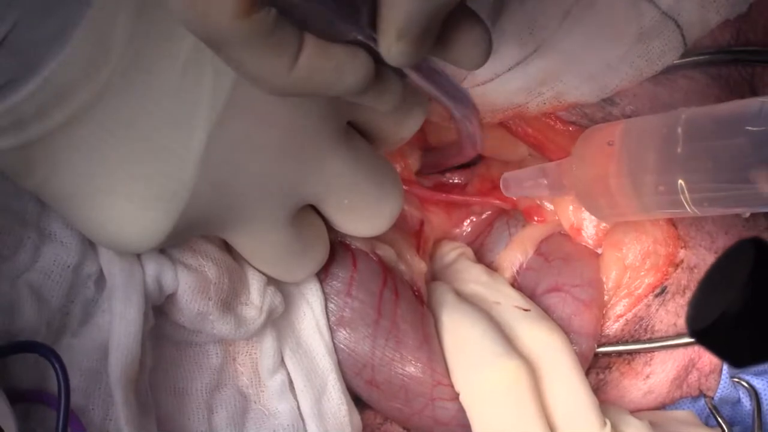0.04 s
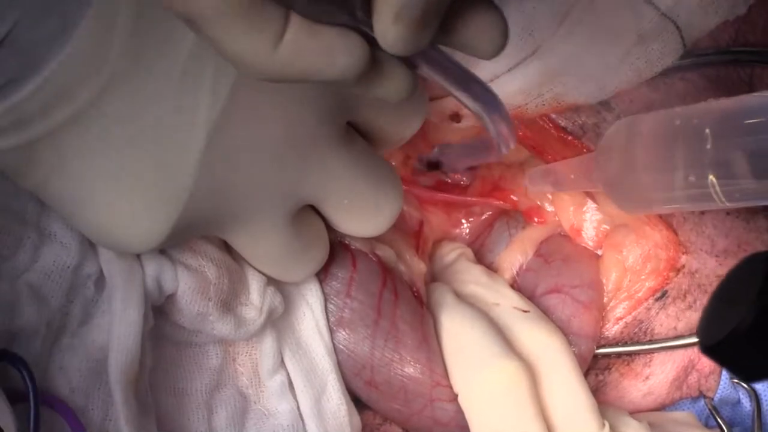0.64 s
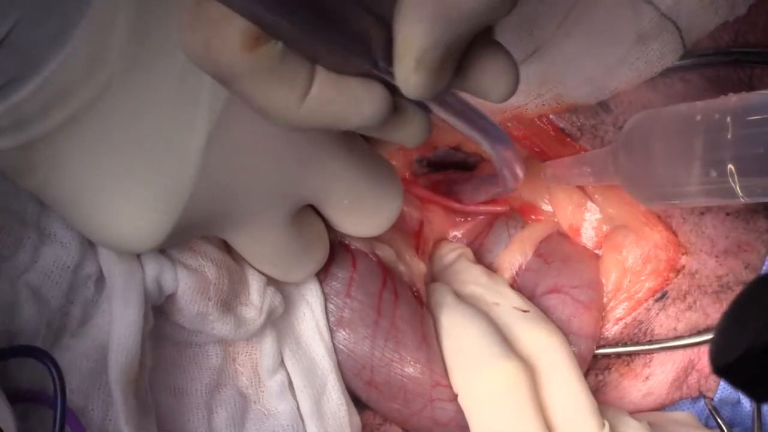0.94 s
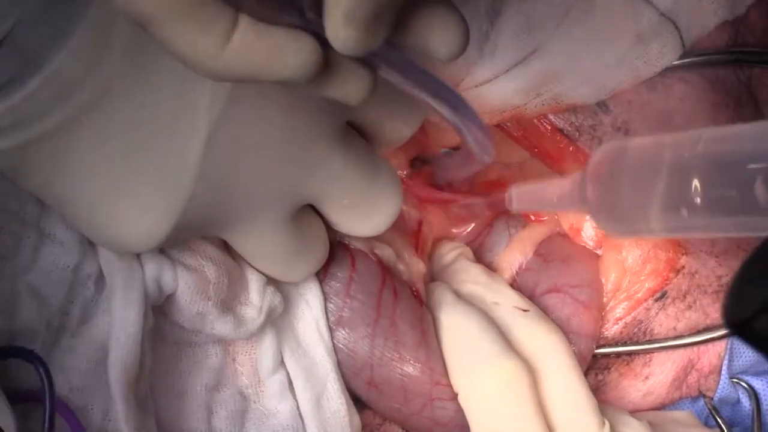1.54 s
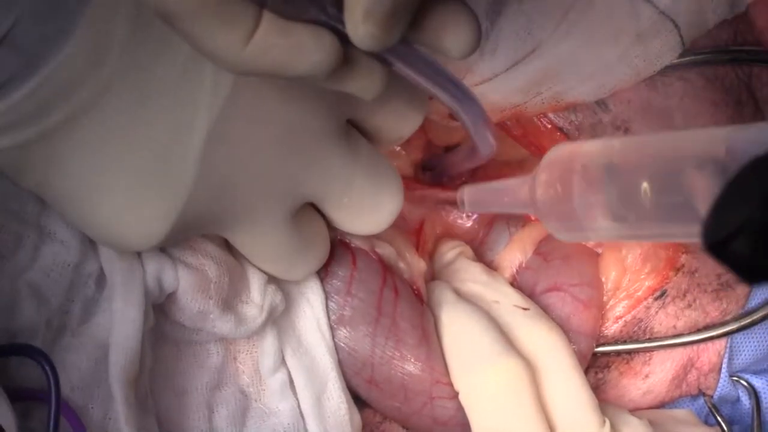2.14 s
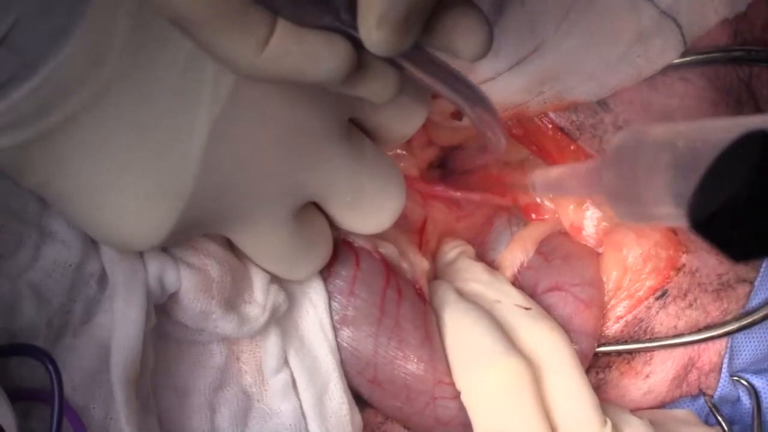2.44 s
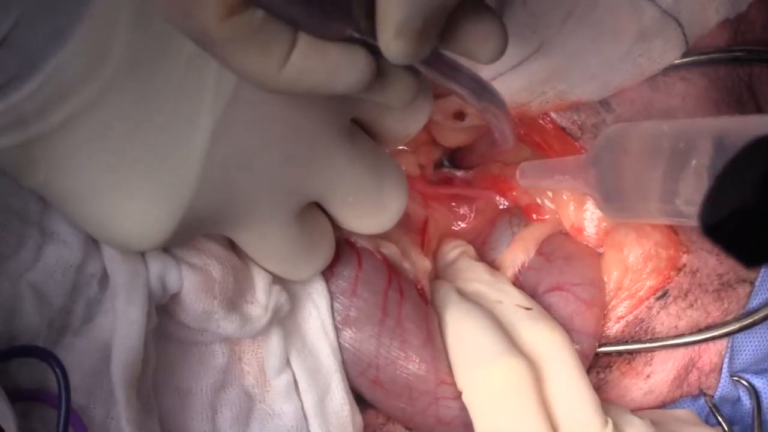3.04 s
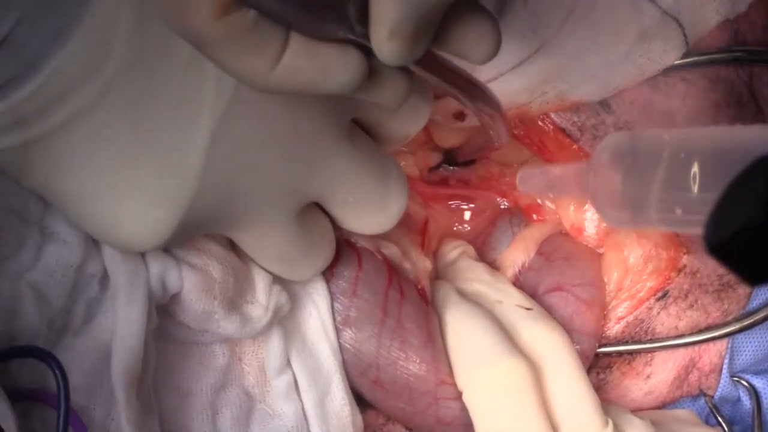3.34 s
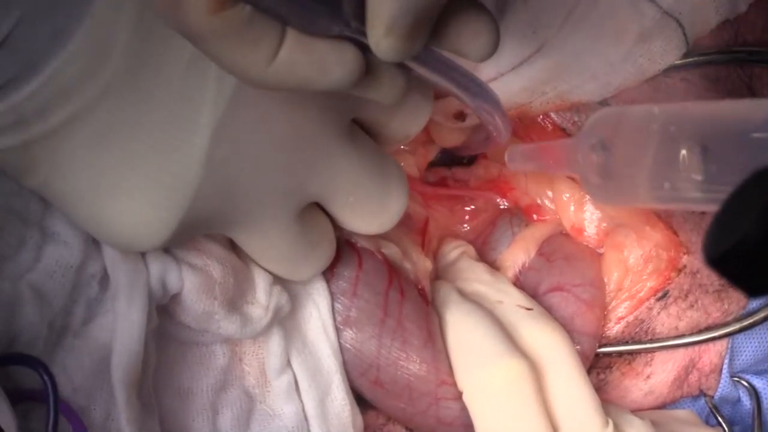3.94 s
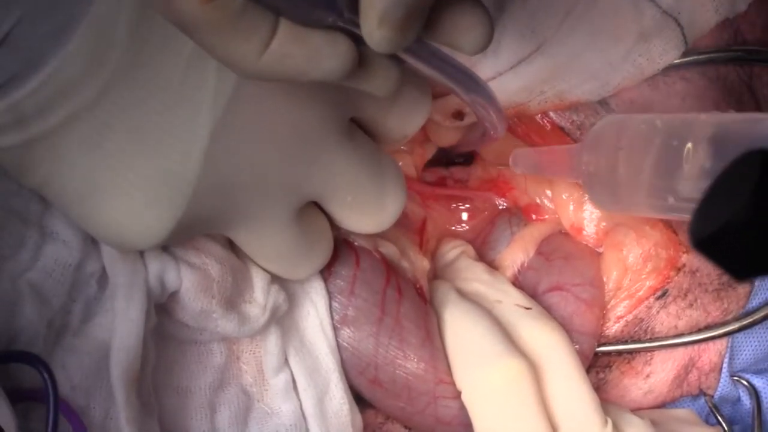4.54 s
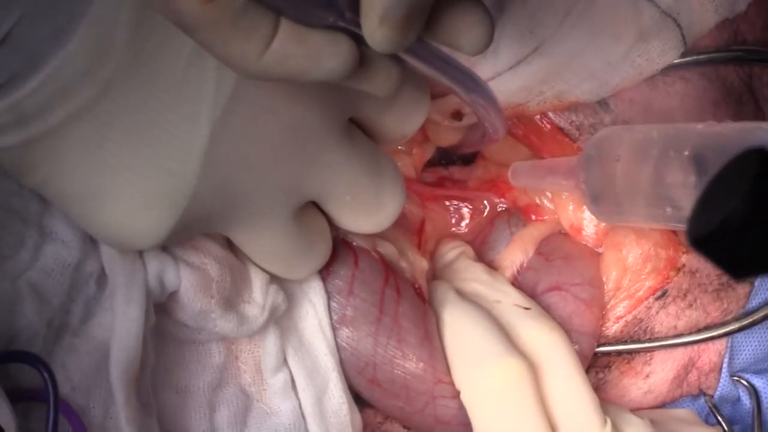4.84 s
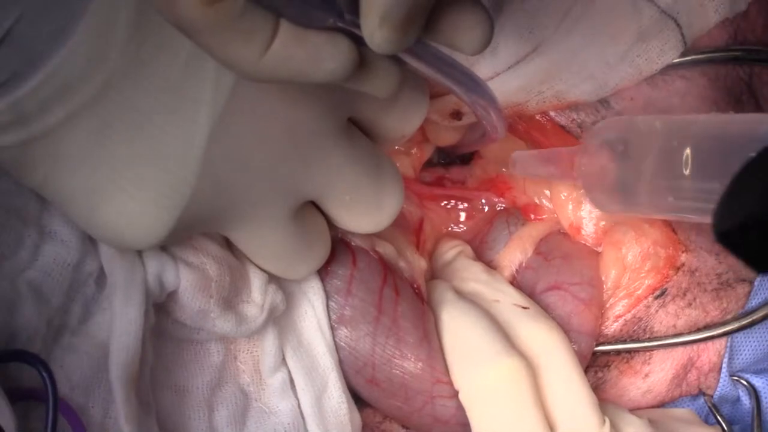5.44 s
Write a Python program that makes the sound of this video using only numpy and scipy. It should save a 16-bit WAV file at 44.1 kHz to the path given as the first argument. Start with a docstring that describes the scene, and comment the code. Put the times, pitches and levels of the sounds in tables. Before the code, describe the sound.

A surgical suction tip draws fluid from a wound, heard close up in a small, fairly dry-sounding operating room. It starts with a sharp wet spit and hollow, hissing slurps. Short uneven spurts continue until about 1.4 seconds, with soft bubble plops and small gulps in the tube, then thin to a quieter hiss. At about 2 seconds a louder, sputtering draw begins, bright and wet, with a sliding, squelchy ring near 2.6 seconds. Just before 3 seconds the tip blocks and the suction drops away. At about 3.3 seconds it breaks open with a cluster of sharp snaps and spurts. From 3.6 seconds to the end, around 5.7 seconds, comes the loudest stretch: a long, steady, high slurping hiss with froth gurgling underneath and a small gulp near 4.5 seconds. Ventilation and equipment hum very faintly throughout.

```python
"""A surgical suction tip draws fluid from a wound: wet spurts, a blocked moment, then a long open draw.
Air tears the liquid at the tip; the air pocket there rings and glides, froth gurgles in the tube and
spray hisses at the rim. Films snap, bubbles plop and slugs of liquid gulp down the tube.
One microphone, close to the tip, in a small operating room where equipment hums faintly."""
import sys
import numpy as np
from scipy import signal
from scipy.fft import rfft, irfft, next_fast_len
from scipy.io import wavfile
from scipy.ndimage import uniform_filter1d, map_coordinates

SR = 44100
rng = np.random.default_rng(int(sys.argv[2]) if len(sys.argv) > 2 else 0)


def log_audio(samples):
    """Write samples as a 16-bit WAV file to the path given in sys.argv[1]."""
    # one column per channel
    frames = np.atleast_2d(samples).T
    # limit to full scale, then quantise
    limited = np.clip(frames, -1, 1)
    pcm = np.round(limited * 32767).astype(np.int16)
    wavfile.write(sys.argv[1], SR, pcm)


N = 251370

# Liquid films snapping at the tip, and a higher ring of the bubble that bursts at 1.692 s. Each row: start in
# seconds, relative level in dB, pitch in Hz.
FILM_SNAPS = [(0.074, -10, 3760), (0.080, -16, 3550), (0.170, -24, 3740), (0.37, -29, 13170),
              (1.692, -39, 3300), (2.33, -14, 4400), (3.237, -45, 4170), (3.279, -12.5, 5350),
              (3.299, -11, 4900), (3.319, -9.5, 5450), (3.407, -5.5, 4320)]
WHISTLE_HZ = 11150  # usual pitch of the gap at the rim


def amp(db):
    """Decibels to gain."""
    return 10 ** (np.asarray(db) / 20)


def unit(x):
    """Scaled to rms 1."""
    return x / np.sqrt(np.mean(x ** 2) + 1e-20)


def along(points, hz):
    """(Hz, value) points read on a log frequency axis."""
    point_hz, values = np.transpose(points)
    return np.interp(np.log(hz + 1), np.log(point_hz + 1), values)


def curves(rows):
    """One value per sample for each column after the time."""
    times, *columns = np.transpose(rows)
    return [np.interp(np.arange(N) / SR, times, column) for column in columns]


def wobble(rate):
    """A smooth random curve, rate knots a second."""
    knots = rng.standard_normal(int(N * rate / SR) + 4)
    return map_coordinates(knots, [np.arange(N) * rate / SR])


def filtered(x, response):
    """x shaped by a response given as a function of Hz."""
    size = next_fast_len(N + SR // 2)
    return irfft(rfft(x, size) * response(np.fft.rfftfreq(size, 1 / SR)), size)[:N]


def gate_db(t, start, end, rise, fall):
    """Rounded attack, hold and release in dB; rise and fall are the seconds for 20 dB."""
    return -20 * ((np.maximum(start - t, 0) / rise) ** 2 + np.maximum(t - end, 0) / fall)


def equipment(swell_s=0.036):
    """Room tone: ventilation and a wavering machine hum whose lowest line swells now and then."""
    # Ventilation colour, then the hum's lines. Each row: frequency in Hz, relative level in dB.
    vent_colour = [(25, -30.5), (70, -13), (110, -18), (200, -3), (280, -3), (420, -9), (520, -6.5),
                   (750, -7.5), (950, -13), (2500, -27.5), (5000, -46)]
    hum_lines = [(150.7, -0.5), (285.3, 2.5), (360.7, -2.5)]
    # Swells of the lowest line. Each row: centre in seconds, relative level in dB.
    hum_swells = [(0.58, -65), (0.97, -53), (1.21, -58), (1.7, -59), (2.35, -53), (3.46, -61), (3.94, -64),
                  (4.62, -68)]
    t = np.arange(N) / SR
    air = unit(filtered(rng.standard_normal(N), lambda hz: amp(along(vent_colour, hz))))
    lines = [amp(db + 0.97 * wobble(3.0)) * np.sin(2 * np.pi * hz * t + 0.63 * wobble(26))
             for hz, db in hum_lines]
    swells = sum(amp(db) * np.exp(-((t - s) / swell_s) ** 2) for s, db in hum_swells)
    return amp(-62) * air + amp(-69.5) * sum(lines) + swells * lines[0]


def room(x, t60, wet_db):
    """The direct sound with a weak, short answer from the hard walls."""
    t = np.arange(SR // 2) / SR
    tail = rng.standard_normal(len(t)) * amp(-60 * t / t60) * (t > .004)
    return x + amp(wet_db) * signal.fftconvolve(x, tail / np.linalg.norm(tail))[:N]


def bursts(rows, t60, attack_s, glide_per_s, splash_db, splash_t60, gain_db=0):
    """Each film breaks with a small splash and rings its air pocket, whose pitch rises as it closes."""
    out, t = np.zeros(N + SR), np.arange(SR // 8) / SR
    for start, db, hz in rows:
        ring = np.sin(2 * np.pi * hz * (t + glide_per_s * t * t / 2)) * amp(-60 * t / t60)
        band = signal.butter(2, [hz * 0.65, min(hz * 1.12, SR * .45)], "bandpass", fs=SR, output="sos")
        splash = unit(signal.sosfilt(band, rng.standard_normal(len(t))))
        splash *= amp(splash_db - 60 * t / splash_t60)
        onset = 1 - np.exp(-t / attack_s)
        out[round(start * SR):][:len(t)] += amp(db + gain_db) * (ring + splash) * onset
    return out[:N]


def plops():
    """Single large bubbles burst with a soft, low ring."""
    # Each row: start in seconds, level in dB, pitch in Hz.
    bubbles = [(0.591, -44, 1340), (0.658, -40.5, 1380), (0.705, -43, 1620), (0.923, -36, 1420),
               (1.692, -40.5, 1830), (1.753, -45, 1460), (1.813, -44, 1440)]
    return bursts(bubbles, t60=0.027, attack_s=.001, glide_per_s=3, splash_db=-8, splash_t60=0.064)


def spits(rebound_s=0.002, rebound_db=-1.5):
    """Each film at the tip snaps sharply, then once more on the rebound."""
    rebounds = [(start + rebound_s, db + rebound_db, hz) for start, db, hz in FILM_SNAPS]
    return bursts(FILM_SNAPS + rebounds, t60=0.01, attack_s=0.0004, glide_per_s=3.4,
                  splash_db=-6, splash_t60=0.0069, gain_db=2.0)


def gulps(throb_hz, depth):
    """Behind each slug the air column changes length, so its resonance slides while it throbs."""
    # Each row: start and length in seconds, first pitch, last pitch and width in Hz, rms level in dB.
    slugs = [(0.049, 0.04, 1136, 890, 450, -45.5), (0.147, 0.024, 864, 790, 300, -50),
             (0.352, 0.1, 1046, 950, 647, -49.5), (0.446, 0.046, 1000, 903, 647, -46),
             (0.829, 0.053, 1940, 2070, 450, -36.5), (0.835, 0.027, 1416, 1280, 400, -37),
             (0.876, 0.087, 775, 770, 348, -43.5), (0.917, 0.041, 1513, 1460, 300, -38.5),
             (1.348, .076, 3640, 3710, 503, -39), (2.499, 0.12, 4310, 3900, 455, -30),
             (2.656, .15, 3880, 3470, 320, -27.5), (3.284, 0.022, 2180, 1630, 400, -37),
             (3.305, 0.073, 1585, 1204, 350, -40), (3.399, .055, 1124, 860, 353, -45.5),
             (4.491, .17, 1142, 1010, 500, -38)]
    out = np.zeros(N + SR)
    for start, length, start_hz, end_hz, width_hz, db in slugs:
        n = max(round(length * SR), 64)
        progress = np.linspace(0, 1, n)
        phase = 2 * np.pi * np.cumsum(start_hz * (end_hz / start_hz) ** progress) / SR
        ring = wobble(width_hz)[:n] * np.sin(phase) + wobble(width_hz)[:n] * np.cos(phase)
        swell = np.sqrt(np.abs(np.sin(np.pi * progress))) * np.exp(depth * wobble(throb_hz)[:n])
        out[round(start * SR):][:n] += amp(db) * unit(ring * swell)
    return out[:N]


def lodged_slugs(x, round_trips_s=(0.001101, .002, .0031), wander=0.129, edge_s=0.052):
    """Slugs lodged in the tube send back short, drifting echoes that turn the sound hollow."""
    # Each row: start and length in seconds, reflection from 0 to 1.
    lodgings = [(0.0, 0.6, 0.36), (4.029, .57, 0.14), (4.757, 0.14, 0.44)]
    n = np.arange(N)
    reflection = sum(size * amp(gate_db(n / SR, start, start + length, edge_s, edge_s))
                     for start, length, size in lodgings)
    echoes = sum(map_coordinates(x, [n - SR * delay * np.exp(wander * wobble(16))])
                 for delay in round_trips_s)
    return (x + reflection * echoes) / np.sqrt(1 + len(round_trips_s) * reflection ** 2)


def tube(x, lift, broaden):
    """Standing waves lift narrow bands of whatever passes through the tube."""
    # Each row: pitch in Hz, width in Hz before broadening, relative level in dB.
    modes = [(602, 29, -0.5), (1061, 74, 4.5), (1431, 88, 0), (1926, 30, 2), (2138, 300, 2),
             (2744, 220, -3.5), (3374, 23, -15), (4047, 25, -0.5), (4400, 56, -0.5), (4780, 46, -5),
             (5250, 410, -2), (5820, 41, -2), (6570, 90, -8), (7110, 100, -2), (9120, 60, -5),
             (9700, 47, -6.5), (10100, 140, 1.5)]

    def peaks(f):
        return sum(amp(db) * 1j * f * width * broaden / (hz * hz - f * f + 1j * f * width * broaden)
                   for hz, width, db in modes)

    return unit(filtered(x, lambda f: 1 + lift * peaks(f)))


def cavity(x, colour, centre_hz, relative_width, patchy_db, frame):
    """An air space colours x with a gliding resonance; a notch and fleeting peaks join, at constant power."""
    # The notch deepens, slides up once and fades. Each row: time in seconds, pitch in Hz, depth 0 to 1.
    notch_path = [(4.6, 2600, 0.61), (4.86, 2390, 0.7), (4.97, 2940, 0.5), (5.1, 2450, .15)]
    hz, t, spectra = signal.stft(x, SR, nperseg=frame)
    at = np.minimum((t * SR).astype(int), N - 1)

    def resonance(peak_hz, width):
        ratio = hz[:, None] / peak_hz
        return 1j * ratio * width / (1 - ratio ** 2 + 1j * ratio * width)

    notch_hz, depth = curves(notch_path)
    notch = 1 - np.clip(depth[at], 0, 1) * resonance(notch_hz[at], 0.11)
    gain = amp(along(colour, hz))[:, None] * resonance(centre_hz[at], relative_width[at]) * notch
    # random peaks and notches come and go, giving a shifting, watery colour
    patches = uniform_filter1d(rng.standard_normal(spectra.shape), size=3, axis=0)
    patches = uniform_filter1d(patches, size=11, axis=1)
    gain *= amp(patchy_db * unit(patches))
    gain /= np.sqrt(np.mean(np.abs(gain) ** 2, axis=0))
    return unit(signal.istft(spectra * gain, SR, nperseg=frame)[1][:N])


def leak(t, seal_s=2.92, fade_db_per_s=56.5, pocket_hz=5260, opening=0.27):
    """Between spurts a little air slips evenly past the tip, dying away once the tip seals."""
    fade_db = fade_db_per_s * np.maximum(t - seal_s, 0)
    slurp_db, hiss_db, gurgle_db = -59 - fade_db, -54 - fade_db, -68 - fade_db
    return slurp_db, hiss_db, gurgle_db, pocket_hz, WHISTLE_HZ, opening, 0


def spurt(t, start, hold, rise, fall, slurp_db, hiss_db, gurgle_db, pocket_hz, whistle_hz, opening):
    """One gasp of the tip: all layers share an envelope, and a drowned tip sputters most."""
    gate = gate_db(t, start, start + hold, rise, fall)
    sputtering = 0.56 * (1 - opening)
    return slurp_db + gate, hiss_db + gate, gurgle_db + gate, pocket_hz, whistle_hz, opening, sputtering


def draw(t, rows, rise, base_opening, sputtering):
    """A sustained draw: it opens, follows its flow and stops when the tip plugs."""
    times, *columns = np.transpose(rows)
    slurp_db, hiss_db, gurgle_db, pocket_hz = [np.interp(t, times, column) for column in columns]
    gate = gate_db(t, times[0], times[-1], rise, fall=0.029)
    levels_db = slurp_db + 0.22 + gate, hiss_db - 0.5 + gate, gurgle_db + 2 + gate
    # the wider the gap, the more the hiss stands over the slurp
    opening = base_opening * np.exp(0.064 * (hiss_db - slurp_db))
    return *levels_db, pocket_hz, WHISTLE_HZ, opening, sputtering


def airflow(step_s=.001):
    """Spurts, leak and draws make one stream: powers add, and the strongest flow shapes the tip."""
    # Each row: time of full flow, hold, rise and fall in seconds; relative slurp, hiss and gurgle
    # levels in dB; air pocket and rim whistle in Hz; tip opening from 0 to 1.
    spurts = [ (0.02, .15, .05, .08, -29.5, -32.5, -48, 3450, 10500, .1),
              (0.073, .008, 0.042, .04, -20.5, -37, -31.5, 3440, 10500, 0),
              (0.22, 0.14, .05, .1, -42, -41, -49, 3300, 11500, .1),
              (0.372, 0.046, 0.025, 0.062, -64, -26, -48, 3400, 13200, 0.2),
              (0.464, .012, .06, 0.039, -64, -48, -48, 4000, 12000, .9),
              (0.745, .024, 0.025, .1, -35, -34.5, -52, 4530, 11300, 0.35),
              (0.832, .045, 0.057, .13, -32, -39.5, -37.5, 3990, 12800, 0.2),
              (0.918, 0.041, .01, 0.034, -37.5, -52, -38.5, 4000, 11000, 0),
              (0.978, 0.0051, .04, .025, -34.5, -31.5, -41.5, 3950, 10200, .25),
              (1.012, .028, .02, .05, -56, -44, -65.5, 3500, 9750, .05),
              (1.098, 0.01, .04, .08, -50, -38, -50.5, 3580, 10600, 0.27),
              (1.269, 0.018, .07, .03, -41.5, -40.5, -68, 6700, 10300, .08),
              (1.295, 0.043, .045, 0.058, -37.5, -32.5, -44.5, 6000, 11500, 0.66),
              (1.347, 0.014, .02, .03, -31, -40, -49.5, 4100, 10600, 0.15),
              (1.385, .02, .03, 0.042, -41, -34.5, -57, 3800, 10600, 0.12),
              (1.486, 0.088, .04, .2, -52, -48, -73.5, 5960, 10700, 0.5),
              (1.628, 0.017, .02, .04, -41.5, -53, -70, 5470, 10400, 0),
              (1.735, 0.037, .04, .08, -42.5, -55, -68.5, 5490, 10400, 0),
              (1.862, .08, .06, .05, -46, -52.5, -63.5, 5100, 10400, 0.16),
              (3.276, 0.0036, 0.0014, .025, -20.5, -39.5, -52, 5400, 12000, 0),
              (3.304, 0.018, 0.013, .008, -20.5, -36, -39.5, 4670, 12000, 0.7),
              (3.333, .027, 0.015, .005, -13, -24, -29.5, 5300, 12000, .6),
              (3.405, 0.11, 0.041, .06, -27, -36.5, -33, 5350, 12000, 0.8),
              (4.195, 0.023, 0.033, .03, -20, -24, -46, 5760, 12000, 0),
              (4.93, 0.018, .06, .05, -24, -23, -42, 6200, 12600, 0.4),
              (5.14, .015, 0.018, .02, -16.5, -24.5, -26.5, 2900, 10700, 1)]
    # Each row: time in seconds, relative slurp, hiss and gurgle levels in dB, air pocket in Hz.
    first_draw = [(1.965, -31.5, -30.5, -40.5, 5960), (2.047, -25.5, -24.5, -35, 5240),
                  (2.125, -21, -22.5, -36, 5880), (2.293, -22.5, -21.5, -34, 5770),
                  (2.343, -21.5, -21.5, -33, 4900), (2.385, -39, -30, -41, 6000),
                  (2.445, -25, -21.5, -34, 5630), (2.609, -22, -30, -36, 4020),
                  (2.625, -18, -32.5, -29.5, 4080), (2.679, -25, -46, -37.5, 3820),
                  (2.711, -16.5, -27.5, -30.5, 4090), (2.755, -18, -23.5, -34.5, 5050),
                  (2.829, -17, -25, -36, 5090), (2.915, -20, -24.5, -31.5, 6380)]
    long_draw = [(3.59, -17.5, -23, -36.5, 4620), (3.62, -17.5, -23, -37.5, 5050),
                 (3.93, -17, -23.5, -36.5, 4640), (4.08, -12, -20, -36, 4980),
                 (4.16, -16, -28, -41.5, 5100), (4.21, -20.5, -20, -39, 5700),
                 (4.22, -18, -26.5, -44, 5400), (4.29, -13, -22.5, -34, 4880), (4.31, -15, -27, -34, 5100),
                 (4.32, -15, -28, -33, 5020), (4.42, -15, -24, -40.5, 4970),
                 (4.59, -13.5, -22, -30.5, 4840), (4.64, -13, -21, -36, 5520),
                 (4.71, -19, -24.5, -33.5, 5300), (4.87, -13.5, -24, -32, 4740),
                 (4.93, -20.5, -23.5, -36.5, 5860), (5.08, -17, -26, -29.5, 5020),
                 (5.16, -13, -20.5, -33, 5400), (5.27, -20, -26, -33, 5210),
                 (5.34, -15, -24.5, -31.5, 4840), (5.43, -15.5, -23, -30.5, 5400),
                 (5.48, -23, -27.5, -33.5, 5510), (5.51, -19, -23.5, -33, 5090),
                 (5.7, -15, -24.5, -32, 5160)]
    # Clots choke the stream for an instant. Each row: centre and half-width in seconds, depth in dB.
    clots = [(2.651, 0.008, 7.5), (3.292, .003, 4.5), (3.328, .002, 10), (3.366, .004, 16),
             (4.175, 0.014, 3), (4.31, 0.009, 8), (4.77, .008, 5.5), (5.06, .015, 2.5)]
    t = np.arange(0, N / SR, step_s)
    flows = [spurt(t, *row) for row in spurts] + [
        leak(t),
        draw(t, first_draw, rise=0.035, base_opening=0.77, sputtering=0.52),
        draw(t, long_draw, rise=0.084, base_opening=0.76, sputtering=0.043)]
    flows = np.array([np.broadcast_arrays(*flow) for flow in flows])
    levels_db, tip_shapes = np.split(flows, [3], axis=1)
    power = amp(levels_db) ** 2 + 1e-20
    weight = power.sum(axis=1, keepdims=True)
    tip_shape = (tip_shapes * weight).sum(axis=0) / weight.sum(axis=0)
    choke_db = sum(db * np.exp(-((t - s) / width) ** 2) for s, width, db in clots)
    total_db = 10 * np.log10(power.sum(axis=0)) - choke_db
    return curves(np.vstack([t, total_db, tip_shape]).T)


def sputter(share, rate, t60, spread_db, attack_s=0.00016):
    """Gain of a stream that liquid films block and release unevenly: sharp starts, quick falls."""
    times = np.cumsum(rng.gamma(2, .5 / rate, 4000))
    sizes = amp(spread_db * np.clip(rng.standard_normal(len(times)), -1.5, 1.5))
    at = (times * SR).astype(int)
    kicks = np.bincount(at[at < N], sizes[at < N], N)
    t = np.arange(SR // 20) / SR
    pulse = amp(-60 * t / t60) * (1 - np.exp(-t / attack_s))
    beats = unit(signal.fftconvolve(kicks, pulse)[:N])
    return np.sqrt(1 - share + share * beats ** 2)


def film_seals(seal_s, depth):
    """Just before it snaps, each film seals the tip and chokes the stream."""
    t = np.arange(N) / SR
    seals = [np.exp(-((t - start + seal_s / 2) / seal_s) ** 2) for start, _, _ in FILM_SNAPS]
    return 1 - depth * np.max(seals, axis=0)


def tearing(rate, spread_db, air_db):
    """Tiny ruptures of uneven size at random moments, over turbulent air."""
    ruptures = (rng.random(N) < rate / SR) * rng.choice([-1, 1], N)
    sizes = amp(spread_db * np.clip(rng.standard_normal(N), -2, 2))
    return unit(unit(ruptures * sizes) + amp(air_db) * rng.standard_normal(N))


def gurgle(opening):
    """Froth further down the tube rings low and broad, its pitch wandering."""
    # Each row: frequency in Hz, relative level in dB.
    froth_colour = [(130, -7), (280, -2), (420, -5.5), (600, -4), (760, -3.5), (1050, -7), (1500, -0.5),
                    (2150, -3), (2500, -1), (3500, -11), (6000, -46)]
    bubble_hz = 1817 * np.exp(.12 * wobble(9) + 0.043 * wobble(45))
    froth = tube(tearing(rate=900, spread_db=0.5, air_db=4.5), lift=0.95, broaden=0.6)
    return cavity(froth, froth_colour, bubble_hz, 0.56 + 0.69 * opening, patchy_db=3.5, frame=640)


def hiss(whistle_hz, opening):
    """Fine spray jets through the gap at the rim."""
    # Each row: frequency in Hz, relative level in dB.
    jet_colour = [(2000, -20), (6000, -9.5), (7800, -2), (8600, 0.5), (9300, 3.5), (10200, 1),
                  (11100, -3.5), (12400, 0.5), (15800, 2)]
    spray = tube(tearing(rate=3500, spread_db=4.0, air_db=1), lift=0.65, broaden=0.74)
    drifting_hz = whistle_hz * np.exp(.06 * wobble(9))
    return cavity(spray, jet_colour, drifting_hz, 0.36 + 0.15 * opening, patchy_db=2.1, frame=256)


def slurp(pocket_hz, opening):
    """Tearing films ring the air pocket at the tip: the smaller the opening, the sharper the ring."""
    # Each row: frequency in Hz, relative level in dB.
    pocket_colour = [(1500, -37), (2500, -7.5), (3100, 0), (4000, 2), (5200, -6), (6500, 2), (7000, -3),
                     (7600, -17.5), (9000, -60), (14000, -31.5)]
    wavering_hz = pocket_hz * np.exp(0.02 * wobble(60))
    films = tube(tearing(rate=2600, spread_db=1.5, air_db=1.0), lift=1.27, broaden=0.67)
    return cavity(films, pocket_colour, wavering_hz, 0.67 * opening, patchy_db=2.0, frame=384)


def suction():
    """One unsteady air stream drives slurp, gurgle and hiss; the slurp follows its pulses most."""
    slurp_db, hiss_db, gurgle_db, pocket_hz, whistle_hz, opening, sputtering = airflow()
    opening, sputtering = np.clip([opening, sputtering], .04, .97)
    stream = sputter(sputtering, rate=230, t60=0.058, spread_db=4.0)
    stream *= amp(0.82 * wobble(35) + 0.078 * wobble(130))
    stream *= film_seals(seal_s=.0025, depth=.75)
    pocket, froth, jet = slurp(pocket_hz, opening), gurgle(opening), hiss(whistle_hz, opening)
    return (pocket * stream * amp(slurp_db - 0.47)
            + froth * stream ** 0.23 * amp(gurgle_db + 0.21 * wobble(70) - 1.5)
            + jet * stream ** 0.45 * amp(hiss_db + 1.03))


def scene():
    """Spits, plops, suction and gulps close up, with the walls and equipment far behind; mono."""
    close = spits() + plops() + lodged_slugs(suction()) + gulps(throb_hz=120, depth=0.34)
    return (room(close, t60=0.11, wet_db=-23) + equipment())[None]


def record(dry, ceiling=.9, low_cut_hz=35, top_hz=15850):
    """The tallest peaks are rounded off, the microphone cuts the deep bass and passes nothing above its band."""
    rounded = dry / (1 + np.abs(dry / ceiling) ** 8) ** (1 / 8)
    response = lambda hz: (hz < top_hz) * hz ** 2 / (hz ** 2 + low_cut_hz ** 2)
    return np.array([filtered(channel, response) for channel in rounded])


dry = scene()
out = record(dry)
log_audio(out)
```